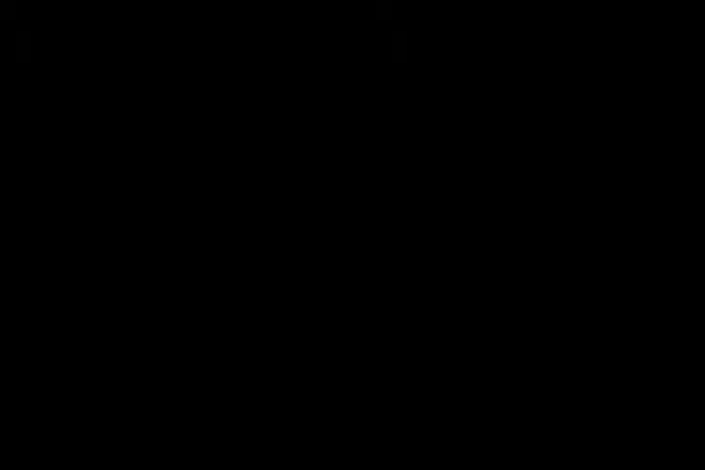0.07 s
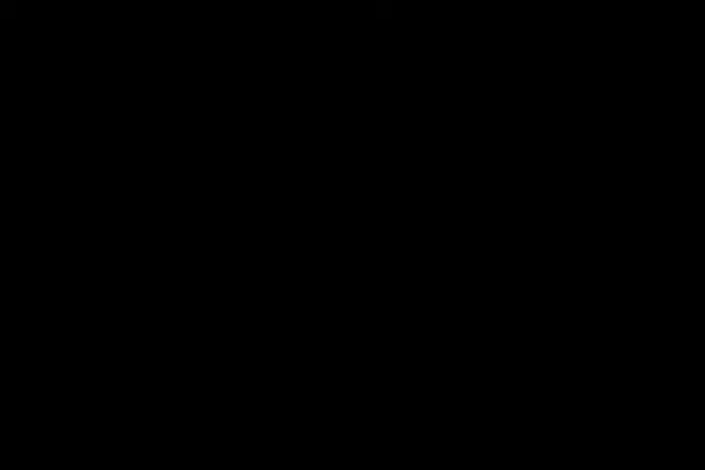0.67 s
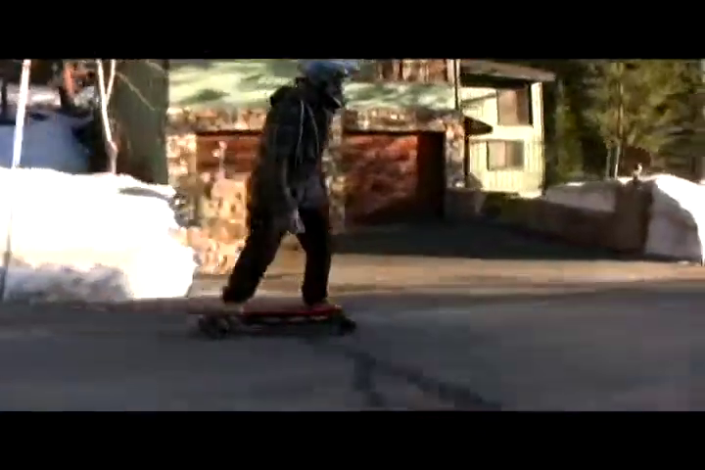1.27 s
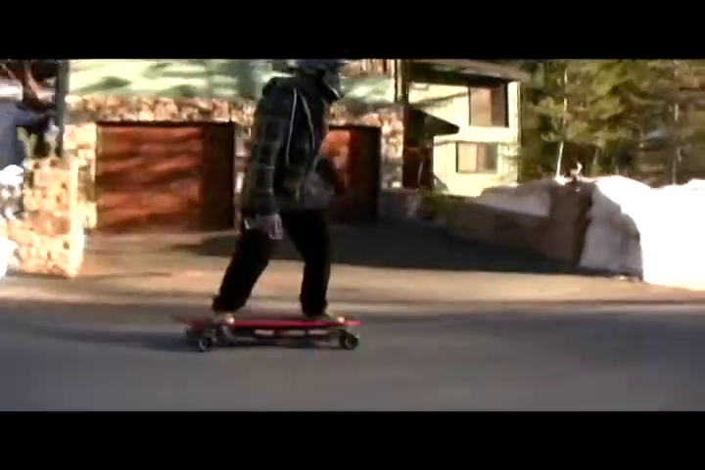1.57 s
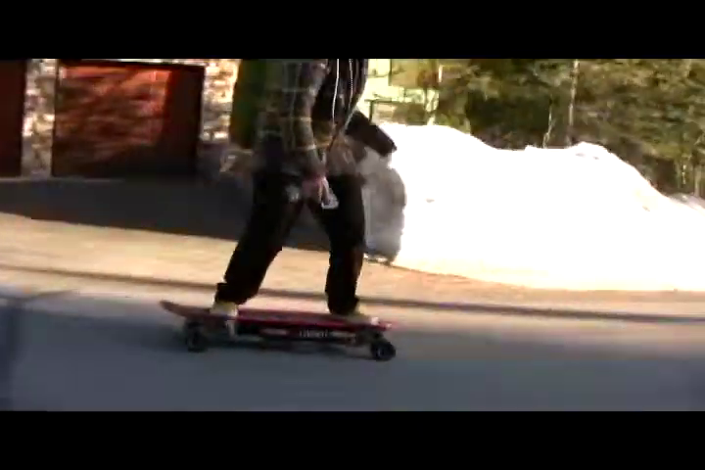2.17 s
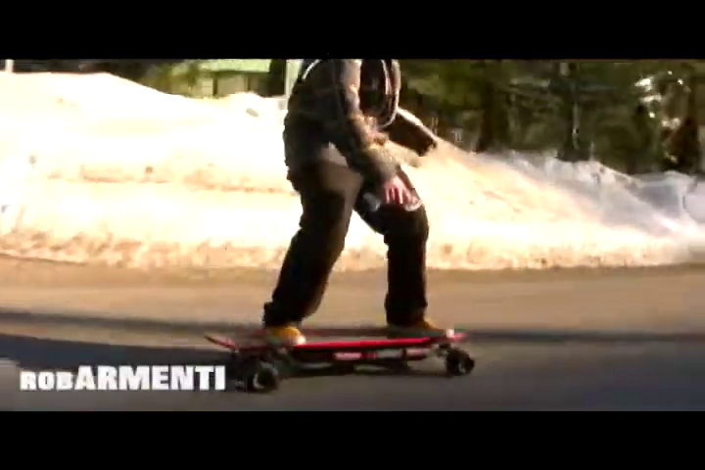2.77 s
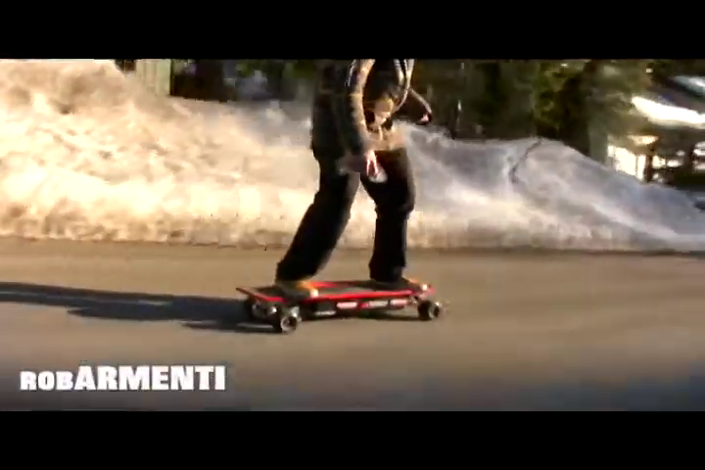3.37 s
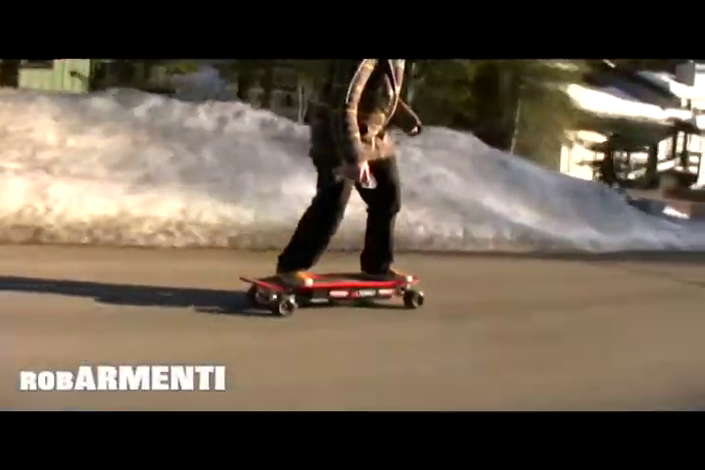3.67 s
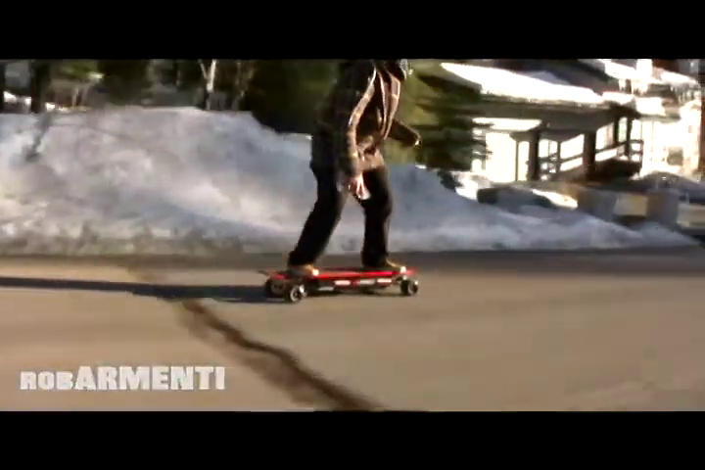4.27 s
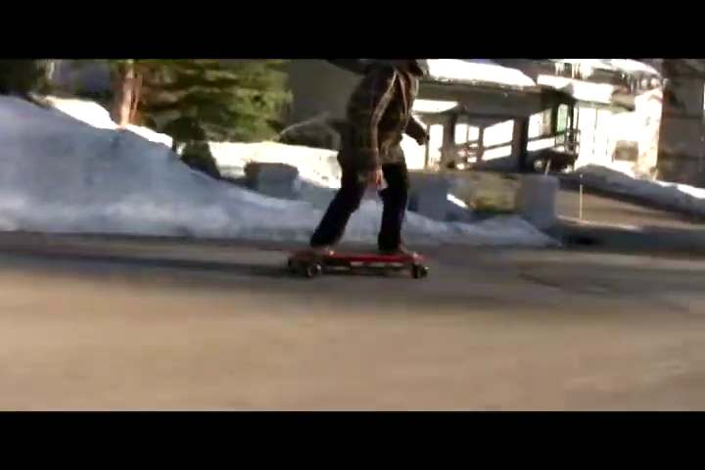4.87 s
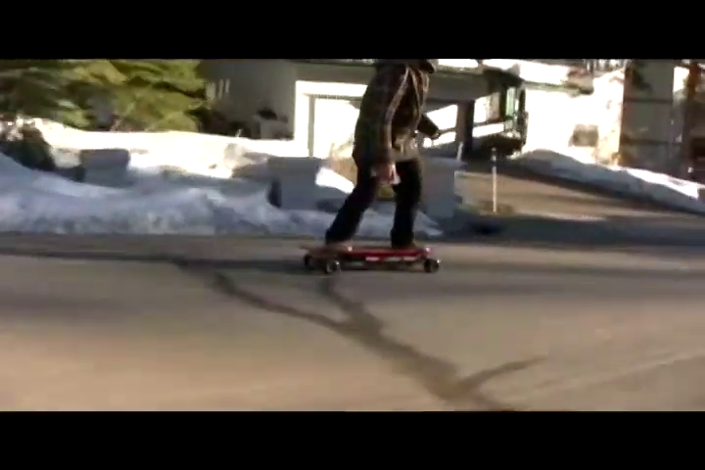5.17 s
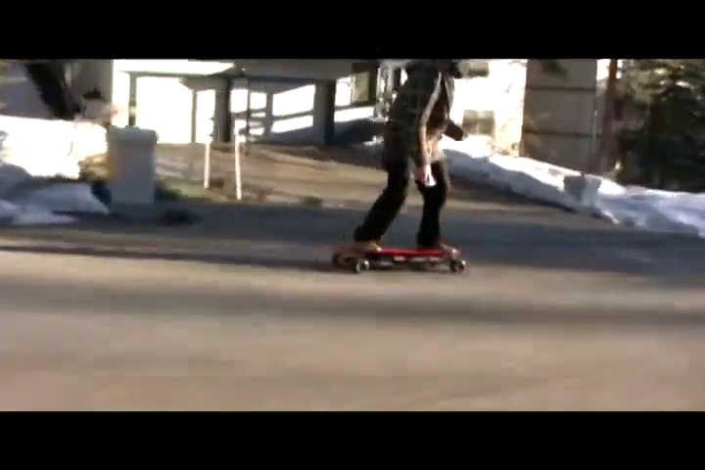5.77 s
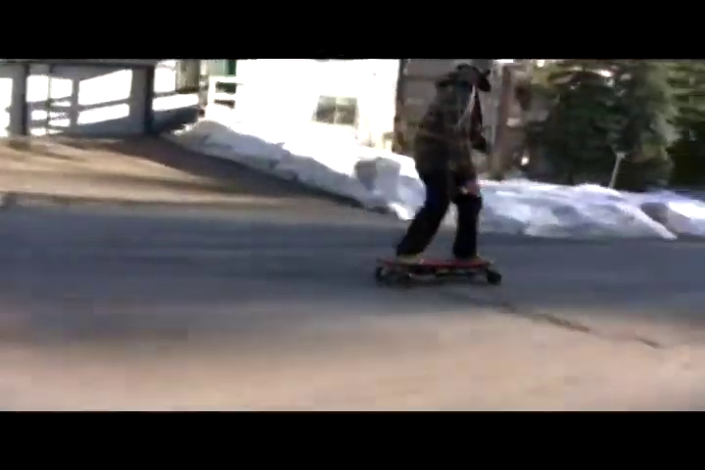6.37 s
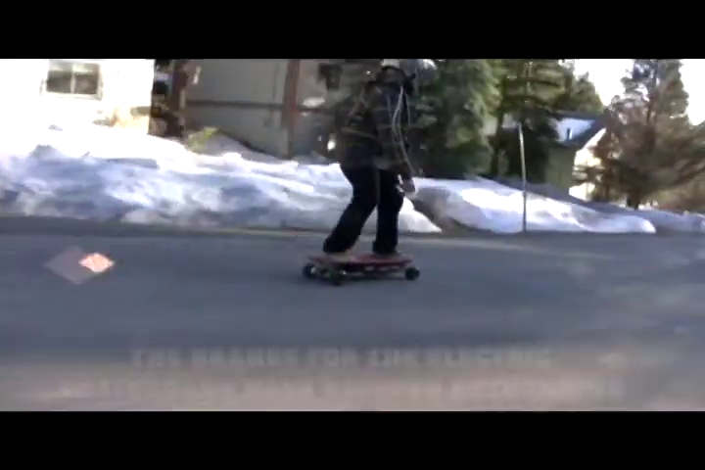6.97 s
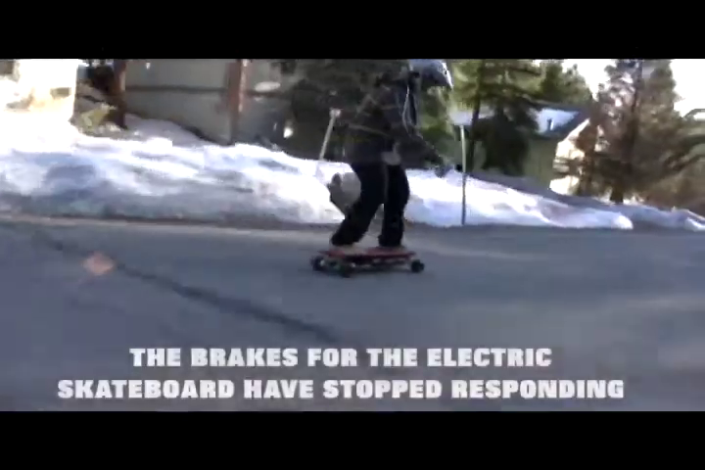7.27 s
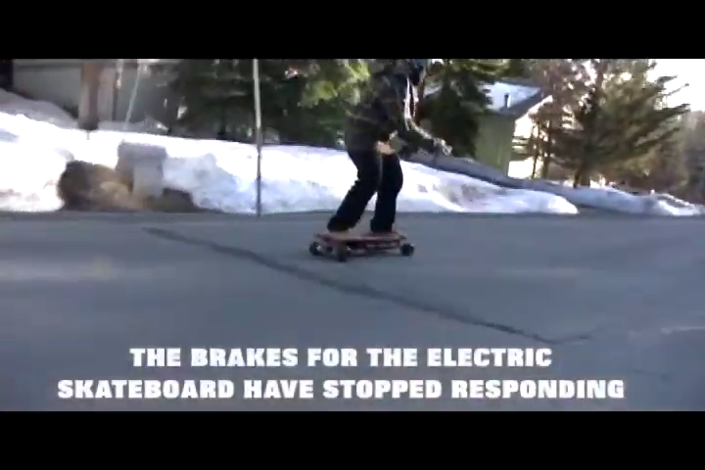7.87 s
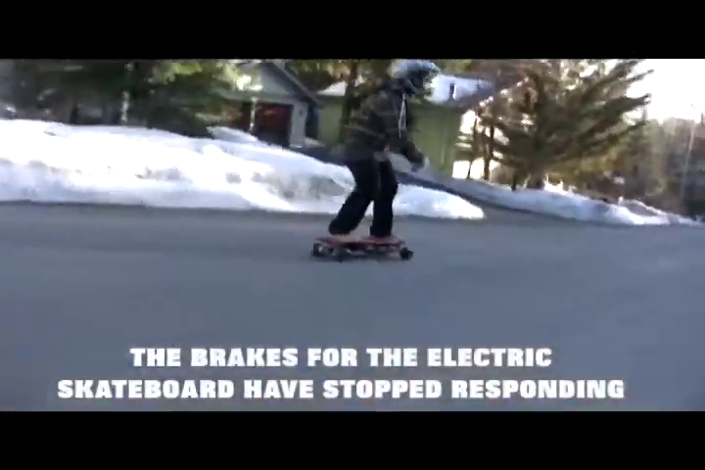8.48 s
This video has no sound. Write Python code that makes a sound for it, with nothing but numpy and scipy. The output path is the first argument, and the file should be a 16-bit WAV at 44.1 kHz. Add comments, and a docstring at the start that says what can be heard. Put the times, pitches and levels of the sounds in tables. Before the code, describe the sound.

Skateboard wheels roar along a paved road with crackling grit, sharp clicks over cracks, a thin electric whine and low gusts of wind.

```python
"""An electric skateboard rolls fast along an asphalt street, heard from alongside.
From the start the road texture makes the wheels rumble and roar, grit crackles and wind buffets the
microphone. Soon stones snap, the rumble knocks dully, and front and rear wheels clack over cracks.
The drive hisses and whines as the board comes close; as it draws ahead, the whine fades and the wheels
ring hollow. Near top speed the bearings ring, a pebble pings, the running gear squeaks and wind gusts."""
import sys
import numpy as np
from scipy import signal
from scipy.fft import rfft, irfft, next_fast_len
from scipy.io import wavfile

SR = 44100
rng = np.random.default_rng(int(sys.argv[2]) if len(sys.argv) > 2 else 0)


def dump_mix(stems):
    """Bounce the given channels to the path in sys.argv[1] as a 16-bit WAV at rate SR."""
    frames = np.atleast_2d(stems).T  # one column per channel
    limited = np.clip(frames, -1, 1)  # hard clip at full scale
    pcm = np.round(limited * 32767).astype(np.int16)
    wavfile.write(sys.argv[1], SR, pcm)


N = 385434

# speed of the board: time_s, speed_m_per_s
BOARD_SPEED = [(.9, 7.0), (2.0, 6.65), (4.25, 7.5), (5.2, 7.65), (7.2, 8.8), (7.9, 8.8), (8.74, 8.3)]
# spectrum of a tyre struck by the road: frequency_hz, level_db
TYRE_SPECTRUM = [(200, -16), (380, -2.5), (480, 2), (565, 0), (650, 0), (740, -3), (890, -6), (1120, -11),
                 (1450, -16.5), (2000, -23), (3000, -30.5), (5000, -42)]


def from_db(db):
    """Amplitude ratio: tenfold for every 20 dB."""
    return 10 ** (np.asarray(db) / 20)


def rms_one(x):
    """Normalisation to unit rms."""
    return x / np.sqrt(np.mean(x ** 2) + 1e-20)


def in_time(rows):
    """Linear interpolation: each column after the time, at every sample."""
    times_s, *columns = np.transpose(rows)
    return [np.interp(np.arange(N) / SR, times_s, column) for column in columns]


def swell(start_s, rise_s, hold_s, fall_s):
    """A trapezoidal envelope, from 0 to 1 and back."""
    return np.interp(np.arange(N) / SR, start_s + np.cumsum([0, rise_s, hold_s, fall_s]), [0, 1, 1, 0])


def drift(per_s):
    """Random modulation of unit rms, taking per_s new values a second."""
    knots = rng.standard_normal(8192)
    return rms_one(np.interp(np.arange(N) / SR * per_s, np.arange(len(knots)), knots))


def grains(per_s, spread_db):
    """Shot noise: random contacts of uneven strength, at unit rms."""
    sizes = from_db(spread_db * np.clip(rng.standard_normal(N), -2, 2)) * rng.choice([-1, 1], N)
    return rms_one(sizes * (rng.random(N) < per_s / SR))


def low_pass(x, cutoff_hz, order=2):
    """Butterworth filtering: 6 dB an octave per order is lost above the cutoff."""
    return signal.sosfilt(signal.butter(order, cutoff_hz, fs=SR, output="sos"), x)


def colour(x, spectrum):
    """Minimum-phase filtering: nothing sounds before its cause, and white noise keeps its level."""
    size = 2 * next_fast_len(N // 2 + SR // 4)
    hz, db = np.transpose(spectrum)
    bins_hz = np.arange(size // 2 + 1) * SR / size + 1  # 1 Hz up, to keep the logarithm finite
    skirts = np.minimum(1, np.minimum(bins_hz / hz[0], hz[-1] / bins_hz)) ** 2  # 12 dB an octave
    gain = rms_one(from_db(np.interp(np.log(bins_hz), np.log(hz), db)) * skirts)
    cepstrum = irfft(np.log(gain + 1e-9))
    cepstrum[1:size // 2] *= 2  # folding the cepstrum makes the filter causal
    cepstrum[size // 2 + 1:] = 0
    return irfft(rfft(x, size) * np.exp(rfft(cepstrum)))[:N]


def resonate(x, hz, width_hz, stages=1):
    """Damped resonance with a peak gain of 1; stages in series narrow the peak."""
    radius = np.exp(-np.pi * width_hz / SR)
    feedforward = np.array([1, 0, -1]) * (1 - radius ** 2) / 2
    feedback = [1, -2 * radius * np.cos(2 * np.pi * hz / SR), radius ** 2]
    for _ in range(stages):
        x = signal.lfilter(feedforward, feedback, x + 1e-18)
    return x


def struck_mode(blows, hz, cycles=3.3):
    """Free decay: a struck body rings for a few cycles; a unit blow peaks near 1."""
    width_hz = hz / cycles
    return resonate(blows, hz, width_hz) * SR / (2 * np.pi * width_hz)


def rough_tone(hz, width_hz):
    """Narrow-band noise of unit rms: amplitude and phase wander about the pitch curve hz."""
    in_phase, quadrature = low_pass(rng.standard_normal((2, len(hz))), width_hz)
    phase = 2 * np.pi * np.cumsum(hz) / SR
    return rms_one(in_phase * np.cos(phase) + quadrature * np.sin(phase))


def knocks(rows, soft_hz=1500):
    """Soft impact: a blunt pulse rings one mode for each row of time_s, level_db, pitch_hz."""
    out = np.zeros(N + SR)
    blow = low_pass(signal.unit_impulse(SR // 20), soft_hz)
    for time_s, db, hz in rows:
        start = round(time_s * SR)
        out[start:start + len(blow)] += from_db(db) * struck_mode(blow, hz)
    return out[:N]


def crumbling(decay_s, chips_db, chips_per_s=2500):
    """Brittle fracture: a first blow, then chips that fall 20 dB in decay_s; unit energy."""
    t = np.arange(SR // 40) / SR
    chips = rng.standard_normal(len(t)) * (rng.random(len(t)) < chips_per_s / SR)
    blows = (t == 0) + chips * from_db(chips_db - 20 * t / decay_s)
    return blows / np.linalg.norm(blows)


def at_speed(texture, top_m_per_s=8.8, pitch_exponent=.3):
    """Time scaling: the faster the road passes, the higher its texture sounds; unit rms."""
    speed_m_per_s, = in_time(BOARD_SPEED)
    pitch_ratio = np.clip(speed_m_per_s / top_m_per_s, 0, 1) ** pitch_exponent
    return rms_one(np.interp(np.cumsum(pitch_ratio), np.arange(N), texture))


def wheels():
    """Roughness excitation: asphalt makes the deck rumble and the tyres roar, more on coarse patches."""
    # the asphalt, patch by patch: time_s, rumble_db, roar_db
    asphalt = [(0.94, -27.5, -28.5), (1.06, -29.5, -25.5), (1.2, -27, -32), (1.52, -29.5, -26.5),
               (1.7, -29, -31), (1.92, -26.5, -29), (2.28, -26, -31.5), (2.62, -28.5, -35.5),
               (2.84, -25.5, -29.5), (3.36, -28.5, -32.5), (3.55, -27, -29), (3.69, -25.5, -31),
               (3.8, -27, -37.5), (3.92, -28, -28.5), (4.15, -28, -30.5), (4.98, -28.5, -32),
               (5.2, -28, -31.5), (5.72, -30, -32.5), (5.85, -28.5, -30.5), (6.22, -29.5, -30.5),
               (6.4, -26, -31.5), (6.87, -32, -32.5), (7.18, -33, -23.5), (7.33, -33, -31.5),
               (7.54, -30.5, -26), (7.66, -30, -30.5), (7.82, -30.5, -25), (8.25, -32.5, -27),
               (8.74, -34.5, -28.5)]
    # response of the deck: frequency_hz, level_db
    deck_spectrum = [(45, -20), (90, -10.5), (150, 1.5), (230, 3), (360, 1.5), (470, -3), (600, -7.5),
                     (750, -15), (1000, -26), (1800, -28), (3000, -60.5)]
    rumble_db, roar_db = in_time(asphalt)
    coarseness = drift(per_s=75)
    stretches_db = .75 * drift(per_s=18)
    rumble = at_speed(colour(grains(per_s=3000, spread_db=2), deck_spectrum))
    rumble *= from_db(rumble_db + 2.5 + 1.12 * coarseness)
    roar = at_speed(colour(grains(per_s=3400, spread_db=4.5), TYRE_SPECTRUM)) * from_db(roar_db)
    tyres = (roar + hollow_note() + tyre_rasp()) * from_db(1.13 * coarseness)
    return (rumble + tyres) * from_db(stretches_db)


def tyre_rasp(width_hz=530):
    """Forced resonance: coarse chippings rasp against the tyre edges in one broad, shifting band."""
    # rasp of the tyre edges: time_s, level_db, pitch_hz
    rasp_curve = [(.92, -43, 1128), (1.95, -42.5, 1123), (2.5, -47, 1075), (3.3, -42.5, 1029),
                  (3.8, -45, 1018), (4.3, -46.5, 977), (4.8, -41.5, 946.5), (5.85, -41.5, 899),
                  (6.7, -40, 876.4), (7.15, -32, 866.3), (7.38, -38, 867), (7.7, -34.5, 875.5),
                  (7.98, -33.5, 870), (8.3, -37.5, 872.4), (8.44, -41, 871), (8.74, -37, 904)]
    db, hz = in_time(rasp_curve)
    texture = resonate(grains(per_s=1500, spread_db=4), hz.max(), width_hz, stages=2)
    gliding = np.interp(np.cumsum(hz / hz.max()), np.arange(N), texture)
    return from_db(db) * rms_one(gliding)


def sand():
    """Shot noise: thousands of tiny contacts a second merge into the crunch of fine sand."""
    # sand on the road: time_s, level_db
    sand_cover = [(.92, -45), (2.0, -44.5), (2.55, -45.5), (2.88, -43), (3.9, -44.5), (4.3, -48),
                  (6.3, -49.5), (6.8, -56), (7.85, -48.5), (8.74, -54)]
    # spectrum of the crunch: frequency_hz, level_db
    crunch_spectrum = [(900, 10), (1800, 14.5), (2600, 11.5), (3600, 6), (4800, -4.5), (6300, -11.5),
                       (8500, -6), (12000, -16)]
    crunch_db, = in_time(sand_cover)
    uneven_db = 1.7 * drift(per_s=140)
    crunch = rms_one(colour(grains(per_s=7000, spread_db=14), crunch_spectrum))
    return crunch * from_db(crunch_db + uneven_db)


def grit(low_hz=1800, high_hz=5400, pitches=10, stray_db=-56.5, edge_s=.19):
    """Brittle fracture: loose grit ticks in clumps, each grain at one of several pitches."""
    # patches of loose grit: start_s, length_s, level_db
    patches = [(3.554, 0.23, -57), (4.095, 0.51, -54.5), (5.4, 1.14, -50.5), (6.8, 1.5, -55),
               (8.337, 0.065, -49.5), (8.641, 0.11, -45)]
    # spectral shaping of the ticks: frequency_hz, level_db
    tick_spectrum = [(600, -25), (1500, 9), (2800, 10), (4000, 11), (6500, 7), (9000, -2), (11000, -18),
                     (14000, -29)]
    clumps = from_db(4.5 * drift(per_s=60))
    blows = grains(per_s=600 * clumps, spread_db=6)
    pitch_index = rng.integers(0, pitches, N)
    ticks = np.zeros(N)
    for index, hz in enumerate(np.geomspace(low_hz, high_hz, pitches)):
        tick = struck_mode(crumbling(decay_s=.0027, chips_db=-1), hz)
        ticks += signal.oaconvolve(blows * (pitch_index == index), tick)[:N]
    on_patches = sum(from_db(db) * swell(start_s - edge_s, edge_s, length_s, edge_s)
                     for start_s, length_s, db in patches)
    return rms_one(colour(ticks, tick_spectrum)) * (from_db(stray_db) + on_patches)


def drive(ring_db=-12.5, ahead_gain_db=1, ahead_span_s=(3.37, 4.37)):
    """Friction noise: belt and bearings hiss, ring the drive's metal and raise a breathy whistle."""
    # hiss of belt and bearings, louder when close or fast: time_s, level_db
    hiss_curve = [(.92, -53), (2.0, -53.5), (2.55, -57.5), (2.85, -50.5), (3.48, -48.5), (3.95, -59),
                  (5.55, -61.5), (6.05, -55.5), (7.9, -50.5), (8.74, -52.5)]
    # spectrum of the hiss: frequency_hz, level_db
    hiss_spectrum = [(2500, -0.5), (5000, 5.5), (6500, 1), (7200, 4), (8500, 4), (9300, 4.5), (10400, -1.5),
                     (11500, -8), (12600, -17), (14000, -24), (16000, 2)]
    # resonances of the drive: pitch_hz, width_hz, level_db
    drive_modes = [(2820, 65, 5), (3820, 290, -1), (4750, 230, -20), (7100, 130, -26)]
    # the whistle, strongest and highest alongside: time_s, level_db, pitch_hz
    whistle_curve = [(.92, -69, 9530), (2.3, -65, 9400), (2.7, -65.5, 9440), (3.2, -58.5, 9590),
                     (3.6, -56.5, 9630), (3.95, -69, 9620), (5.4, -80, 9500), (6.3, -73, 9450),
                     (6.8, -67, 9420), (7.4, -72, 9400)]
    hiss_db, = in_time(hiss_curve)
    whistle_db, whistle_hz = in_time(whistle_curve)
    ahead = np.interp(np.arange(N) / SR, ahead_span_s, [0, 1])  # the board draws past the microphone
    rub = rng.standard_normal(N)
    flutter_db = 1.3 * drift(per_s=130) + .8 * drift(per_s=35)
    ring = rms_one(sum(from_db(db) * resonate(rub, hz, width, stages=2) for hz, width, db in drive_modes))
    ring *= from_db(hiss_db + ring_db + ahead_gain_db * ahead)
    whistle = rough_tone(whistle_hz, width_hz=170) * from_db(whistle_db + 1.5 * drift(per_s=9.8))
    hiss = rms_one(colour(grains(per_s=7000, spread_db=6.5), hiss_spectrum)) * from_db(hiss_db)
    return (ring + whistle + hiss) * from_db(flutter_db)


def wind(breeze_db=-36.5):
    """Turbulence: eddies press on the microphone as lumpy low noise, with lulls and gusts."""
    # lulls and gusts: start_s, rise_s, hold_s, fall_s, change_db
    gusts = [(2.351, 0.25, .25, .1, -18), (6.6, 0.14, .2, .06, -3.5), (6.987, .05, 0.23, 0.41, 7),
             (7.447, 0.42, 0.29, 0.2, 9)]
    # spectrum of the eddies: frequency_hz, level_db
    eddy_spectrum = [(15, -24), (30, -23), (48, -10), (70, -4), (95, -2.5), (140, -8.5), (260, -41.5)]
    gust_db = sum(db * swell(*timing) for *timing, db in gusts)
    lumps_db = 1.1 * drift(per_s=24)
    eddies = rms_one(colour(rng.standard_normal(N), eddy_spectrum))
    return eddies * from_db(breeze_db + gust_db + lumps_db)


def motor(shake_hz=15, waver_hz=7, waver_db=2.5):
    """Random modulation: the motor whines, a thin unsteady tone inside a buzz roughened by the ride."""
    # the whine, heard while the board is close: time_s, buzz_db, tone_db, pitch_hz
    whine_curve = [(.92, -76, -80, 2850), (1.4, -51.5, -62, 2800), (1.8, -52.5, -60, 2745),
                   (2.1, -56, -68, 2790), (2.7, -58, -70, 2830), (2.82, -50, -52.5, 2826),
                   (3.2, -51, -53.5, 2824), (3.6, -54, -56, 2855), (3.85, -55, -68, 2875),
                   (4.3, -58, -70, 2880), (4.6, -85, -90, 2860)]
    buzz_db, tone_db, hz = in_time(whine_curve)
    buzz = rough_tone(hz + shake_hz * drift(per_s=60), width_hz=75)
    phase = 2 * np.pi * np.cumsum(hz + waver_hz * drift(per_s=25)) / SR
    tone = np.sqrt(2) * np.sin(phase)
    return from_db(buzz_db) * buzz + from_db(tone_db + waver_db * drift(per_s=30)) * tone


def scuffs(width_hz=1800):
    """Sliding friction: grit dragged under a wheel scrapes briefly in a broad band."""
    # scrapes over grit: start_s, length_s, level_db, pitch_hz
    scrapes = [(1.03, 0.078, -41, 2340), (1.26, 0.019, -43.5, 2400), (5.226, .028, -36.5, 2490)]
    rub = grains(per_s=3200, spread_db=5)
    out = np.zeros(N)
    for start_s, length_s, db, hz in scrapes:
        scrape = rms_one(resonate(rub, hz, width_hz, stages=2))
        out += from_db(db) * swell(start_s, length_s / 2, 0, length_s / 2) * scrape
    return out


def stones(snap_db=4, thud_db=1, thud_hz=1400):
    """Brittle fracture: larger stones snap, crumble for a moment and give the wheel a small thud; a few crack
    hits and after-hits snap the same way."""
    # sharp snaps under a wheel, mostly stones breaking; the rows at 4.262 and 4.295 s are after-hits of the
    # crack at 4.226 s, and those at 6.544 and 7.892 s are further crack hits: time_s, level_db, pitch_hz
    fractures = [(1.035, -27, 4000), (1.481, -17, 3300), (1.615, -30, 3200), (2.113, -24, 7500),
                 (2.2927, -23, 7500), (2.353, -31, 3500), (2.7857, -34, 3300), (2.8627, -26, 3200),
                 (3.2015, -27, 3200), (3.338, -25, 3300), (3.879, -29, 3600), (4.01, -26, 3180),
                 (4.0657, -28, 3200), (4.157, -21.5, 2800), (4.2312, -26, 8000), (4.262, -28, 2200),
                 (4.295, -28, 2700), (4.5438, -28, 3400), (4.577, -27, 3232), (4.8257, -32, 3500),
                 (4.961, -27, 3200), (5.2172, -22, 8000), (5.387, -29, 3600), (5.462, -29, 5500),
                 (5.4985, -27, 3400), (5.542, -31, 3400), (5.5657, -30, 3300), (5.6381, -37, 3400),
                 (5.839, -26, 3300), (5.925, -27, 4500), (6.0164, -23, 3110), (6.074, -25, 7000),
                 (6.0855, -24, 2867), (6.222, -25, 3400), (6.2612, -29, 4310), (6.308, -23, 3950),
                 (6.358, -23.5, 4000), (6.453, -22, 7000), (6.544, -21, 5000), (6.658, -30, 7000),
                 (6.6635, -26, 3500), (6.8277, -26, 7000), (7.0047, -20, 7000), (7.1089, -24, 6000),
                 (7.168, -22, 3960), (7.2468, -24, 3800), (7.516, -22, 3340), (7.7726, -23, 4200),
                 (7.892, -20, 5500), (8.204, -26, 3000), (8.255, -19.5, 2600), (8.275, -19, 2800),
                 (8.335, -21, 3000), (8.341, -23, 2800), (8.372, -23, 2830), (8.386, -21, 3004),
                 (8.4108, -21, 3190), (8.419, -22, 3500), (8.435, -24, 3194), (8.4428, -19, 3410),
                 (8.458, -24, 3300), (8.474, -20, 4460), (8.487, -18.5, 4200), (8.505, -22, 3800),
                 (8.563, -29, 3830), (8.592, -30, 3400), (8.644, -24, 2730), (8.6557, -20, 3070),
                 (8.678, -25, 2600)]
    snaps = np.zeros(N)
    for time_s, db, hz in fractures:
        snap = struck_mode(crumbling(decay_s=.011, chips_db=-6), hz, cycles=2.2)
        start = round(time_s * SR)
        snaps[start:start + len(snap)] += from_db(db) * snap
    thuds = knocks([(time_s, db + thud_db, thud_hz) for time_s, db, _ in fractures])
    return from_db(snap_db) * low_pass(snaps, cutoff_hz=9000) + thuds


def dull_knocking(knock_db=6, small_db=-10, small_per_s=3):
    """Damped transients: brief dull knocks and swells in the road rumble; small ones come at random."""
    # brief dull knocks and swells in the road rumble: time_s, level_db, pitch_hz
    rumble_knocks = [(1.208, -21, 450), (1.395, -17.5, 350), (1.515, -18, 410), (1.667, -22, 650),
                     (1.752, -22, 600), (1.892, -20, 850), (2.055, -32, 320), (2.495, -17.5, 215),
                     (3.046, -25, 653), (3.09, -34, 650), (3.206, -18, 250), (3.283, -22, 380),
                     (3.399, -16, 329.4), (3.417, -18, 556), (3.876, -20, 566), (4.098, -19, 603),
                     (5.168, -20, 387), (5.223, -15.5, 480), (5.46, -23, 467), (5.681, -25, 450),
                     (6.085, -21, 200), (6.261, -17, 377), (6.292, -21, 650), (6.383, -18, 596),
                     (6.59, -24, 264), (6.674, -23, 650), (6.817, -24, 706), (6.845, -21, 627),
                     (7.107, -25, 544), (7.168, -14.5, 600), (7.243, -15, 450), (7.434, -17, 600),
                     (8.34, -14.5, 650), (8.442, -14.5, 790), (8.476, -18.5, 800), (8.559, -33, 700)]
    small_pulses = from_db(small_db) * (rng.random(N) < small_per_s / SR)
    return from_db(knock_db) * knocks(rumble_knocks) + colour(small_pulses, TYRE_SPECTRUM)


def wheel_drops(wheelbase_m=.75):
    """Travel delay: the rear wheels meet each crack after the front, by wheelbase over speed."""
    # cracks across the road: time_s, clack_db, thump_db, decay_s, rear_change_db
    road_cracks = [(1.369, -36.5, -23, 0.018, 1.5), (1.885, -33, -16, 0.018, -1),
                   (1.942, -41, -23, 0.041, -4.5), (2.191, -39, -28, 0.022, -3),
                   (4.226, -31.5, -19.5, 0.022, -1), (5.117, -31.5, -18, 0.015, -1),
                   (5.787, -46, -22, 0.098, -23), (7.177, -35.5, -18.5, 0.022, -7.5),
                   (7.517, -37, -45, 0.0052, 4.5), (7.81, -36, -15, 0.0063, -9),
                   (7.853, -30.5, -34, 0.014, 0.5), (7.869, -35, -28, 0.011, -2)]
    for time_s, clack_db, thump_db, decay_s, rear_db in road_cracks:
        delay_s = wheelbase_m / np.interp(time_s, *np.transpose(BOARD_SPEED))
        yield time_s, clack_db, thump_db, decay_s
        yield time_s + delay_s, clack_db + rear_db, thump_db + rear_db, decay_s


def cracks(rise_s=.0028, rattle_db=-12, rattle_s=.048, rebound_s=.054, rebound_db=10, rebound_hz=430):
    """Impact excitation: a wheel drop thumps and rings the trucks; hardware rattles, the deck rebounds."""
    # resonances of the trucks: pitch_hz, width_hz, level_db
    truck_modes = [(1400, 230, -13), (1850, 280, 4), (2470, 380, -3.5), (3190, 240, 7.5), (4200, 110, -5)]
    # spectrum of the gritty clack: frequency_hz, level_db
    clack_spectrum = [(300, 1), (1000, -6), (2200, 20), (3800, 8), (6000, 3), (9500, 3.5), (11500, -5.5),
                      (13500, -20), (16000, -30)]
    # spectrum of the thump: frequency_hz, level_db
    thump_spectrum = [(70, -14), (200, -9), (500, -5), (900, -18.5), (1500, -18.5), (3000, -50.5)]
    clack, rattle, thump = np.zeros((3, N))  # envelopes
    t = np.arange(SR // 4) / SR
    rise = np.minimum(t / rise_s, 1)
    rebounds = []
    for time_s, clack_db, thump_db, decay_s in wheel_drops():
        span = slice(round(time_s * SR), round(time_s * SR) + len(t))
        blow = rise * from_db(-20 * np.maximum(t - rise_s, 0) / decay_s)
        clack[span] += from_db(clack_db) * blow
        rattle[span] += rise * from_db(clack_db + rattle_db - 20 * t / rattle_s)
        thump[span] += from_db(thump_db) * blow
        rebounds.append((time_s + rebound_s, clack_db + rebound_db, rebound_hz))
    contact = clack * grains(per_s=6000, spread_db=1) + rattle * grains(per_s=580, spread_db=0)
    ring = sum(resonate(contact, hz, width) * from_db(db + 3 * drift(per_s=16))
               for hz, width, db in truck_modes)
    thumps = colour(thump * rng.standard_normal(N), thump_spectrum)
    return colour(contact, clack_spectrum) + ring + knocks(rebounds) + thumps


def hollow_note(waver_hz=10):
    """Resonance: the wheels ring with one hollow note that wavers with the load on them."""
    # the note, coming out as the board draws ahead and gathers speed: time_s, level_db, pitch_hz
    note_curve = [(3.2, -46, 440), (3.6, -35, 450), (5.3, -34.5, 464.8), (5.9, -36.5, 494.6),
                  (6.45, -30, 499), (6.95, -31.5, 539.5), (7.4, -35.5, 499), (8.0, -32.5, 525.5),
                  (8.74, -34.5, 471)]
    db, hz = in_time(note_curve)
    return from_db(db) * rough_tone(hz + waver_hz * drift(per_s=8), width_hz=49)


def bearings(wander_hz=55, shimmer_db=3):
    """Modal vibration: near top speed the bearings ring faintly, each note coming and going alone."""
    # resonances of the bearings: pitch_hz, width_hz, level_db
    bearing_modes = [(5000, 96, -66), (5870, 90, -68), (7130, 130, -65), (8700, 95, -74), (9300, 82, -80),
                     (11580, 100, -81)]
    ring = np.zeros(N)
    for hz, width_hz, db in bearing_modes:
        note = rough_tone(hz + wander_hz * drift(per_s=5.5), width_hz)
        ring += note * from_db(db + shimmer_db * drift(per_s=9))
    return ring * swell(start_s=6.1, rise_s=1.6, hold_s=.91, fall_s=.99)


def pebble(gain_db=27):
    """Impulse response: a flung pebble bounces off metal, whose modes ring briefly."""
    # bounces of the pebble: time_s, level_db
    bounces = [(6.520, -34), (6.5452, -29.5), (6.5515, -34), (6.554, -33)]
    # resonances of the struck metal: pitch_hz, width_hz, level_db
    metal_modes = [(3017, 280, 4), (4400, 300, -3), (5860, 300, -5), (7150, 220, -1.5), (8500, 400, -7),
                   (9500, 220, -2.5), (10500, 400, -5), (11500, 350, -4)]
    blows = np.zeros(N)
    for time_s, db in bounces:
        blows[round(time_s * SR)] += from_db(db)
    ping = sum(from_db(db) * resonate(blows, hz, width) for hz, width, db in metal_modes)
    return from_db(gain_db) * low_pass(ping, cutoff_hz=12400, order=10)


def squeaks(width_hz=70):
    """Amplitude modulation: each squeak of the running gear is a narrow band that swells and fades."""
    # squeaks of the running gear: start_s, length_s, pitch_hz, level_db
    gear_squeaks = [(6.717, 0.33, 3430, -57), (7.76, .08, 5900, -55), (7.923, 0.1, 3960, -49),
                    (8.662, 0.11, 6160, -52)]
    out = np.zeros(N + SR)
    for start_s, length_s, hz, db in gear_squeaks:
        start, length = round(start_s * SR), round(length_s * SR)
        arch = np.sin(np.linspace(0, np.pi, length))
        out[start:start + length] += from_db(db) * arch * rough_tone(np.full(length, hz), width_hz)
    return out[:N]


def scene():
    """Superposition: road contact, running gear and wind add in one channel."""
    road = wheels() + dull_knocking() + cracks() + sand() + grit() + stones() + scuffs() + pebble()
    return (road + drive() + motor() + bearings() + squeaks() + wind())[None]


def record(dry, start_s=.917, ceiling=.5, top_hz=15800):
    """Band limiting and saturation: after an abrupt start, the treble is dulled and peaks are rounded."""
    onset = np.clip((np.arange(N) / SR - start_s) / .001, 0, 1)
    dulled = low_pass(dry * onset, cutoff_hz=11700, order=3)
    rounded = ceiling * np.tanh(dulled / ceiling)
    return signal.sosfilt(signal.ellip(10, .1, 80, top_hz, fs=SR, output="sos"), rounded)


dry = scene()
out = record(dry)
dump_mix(out)
```